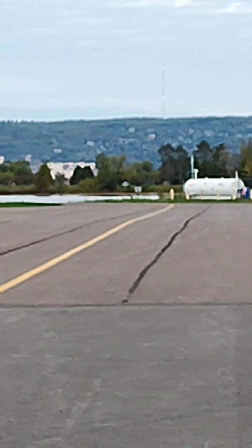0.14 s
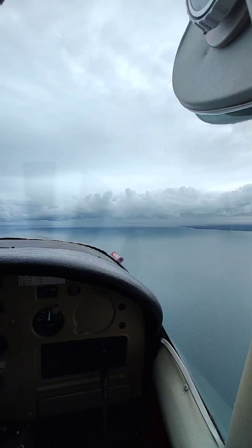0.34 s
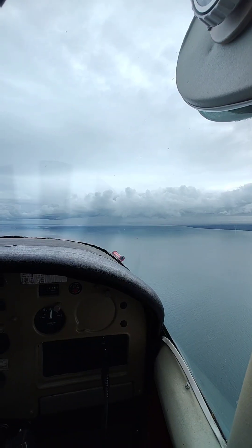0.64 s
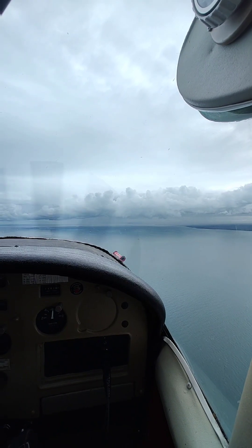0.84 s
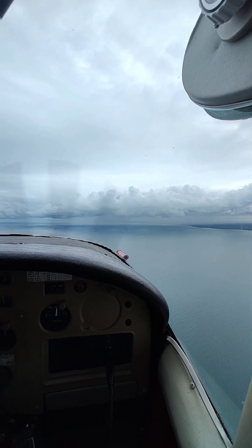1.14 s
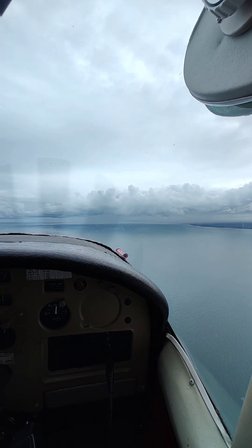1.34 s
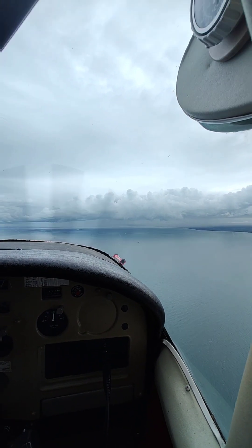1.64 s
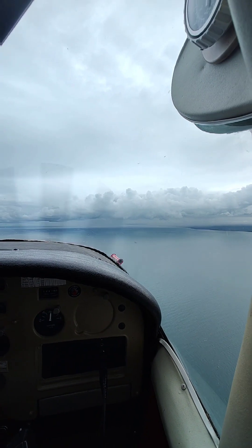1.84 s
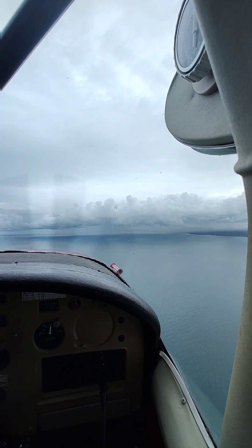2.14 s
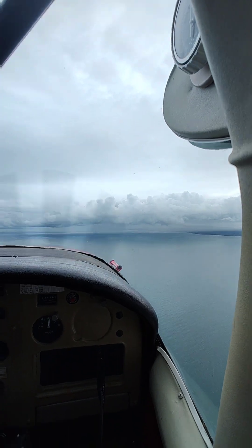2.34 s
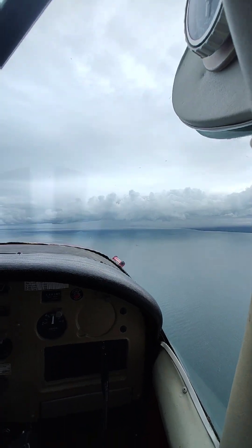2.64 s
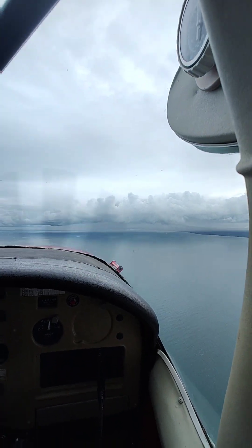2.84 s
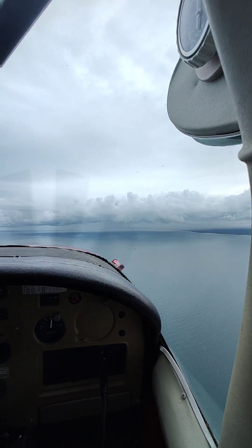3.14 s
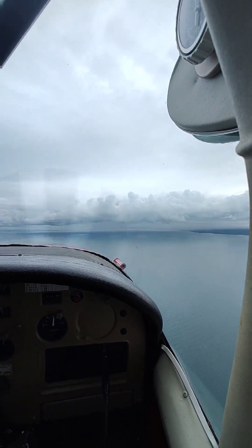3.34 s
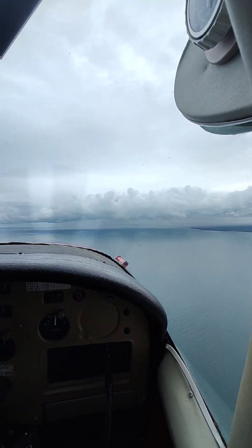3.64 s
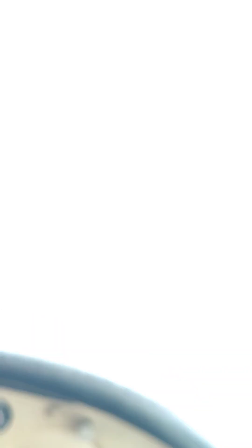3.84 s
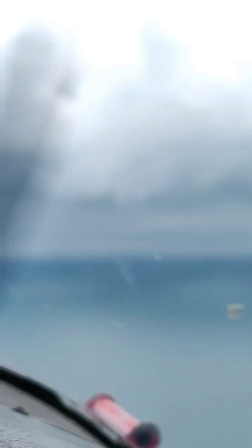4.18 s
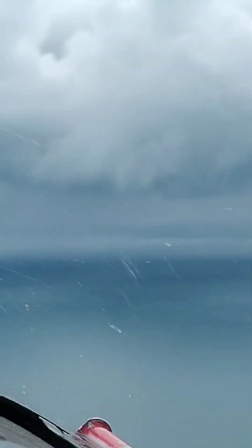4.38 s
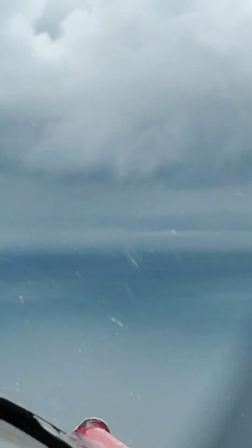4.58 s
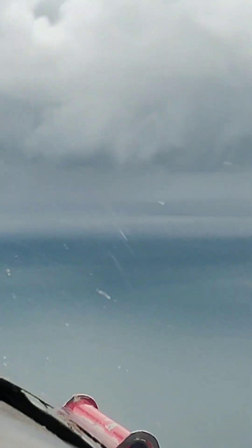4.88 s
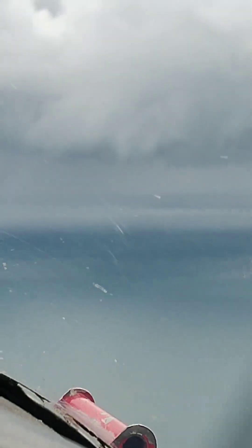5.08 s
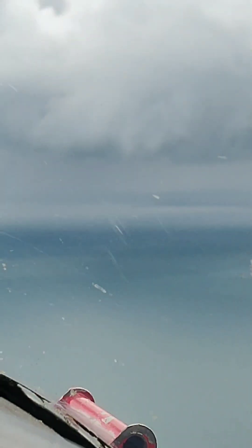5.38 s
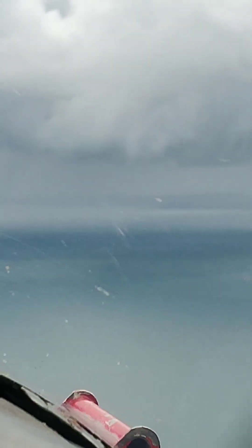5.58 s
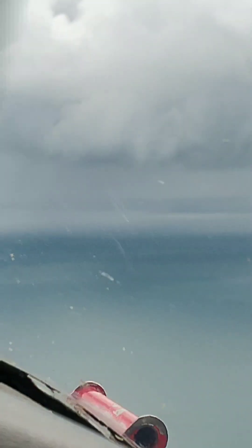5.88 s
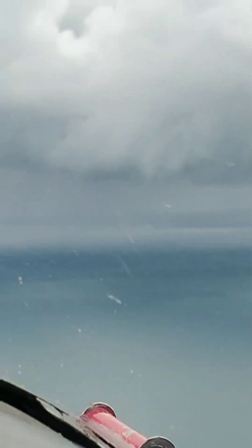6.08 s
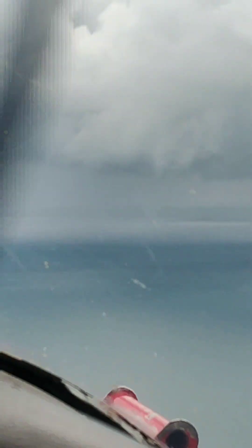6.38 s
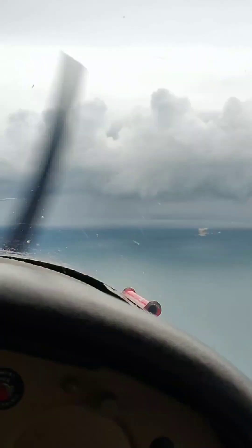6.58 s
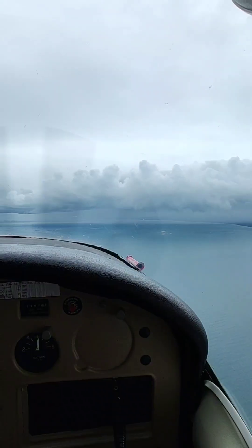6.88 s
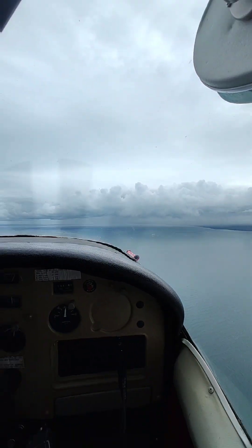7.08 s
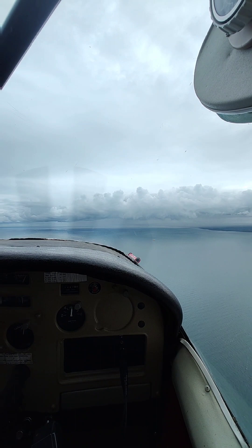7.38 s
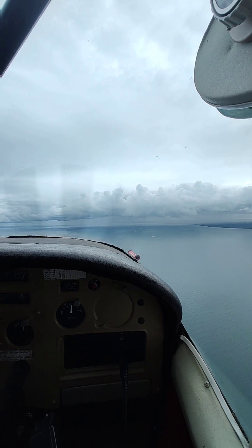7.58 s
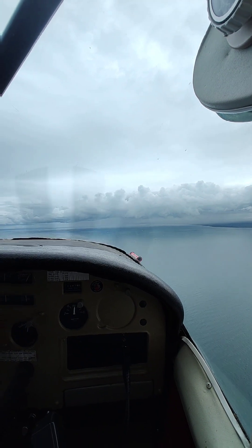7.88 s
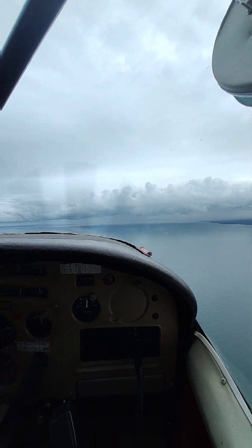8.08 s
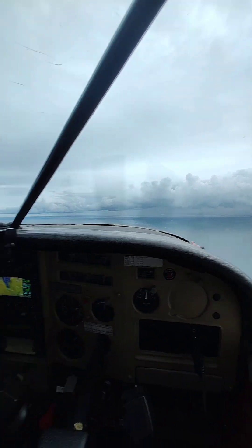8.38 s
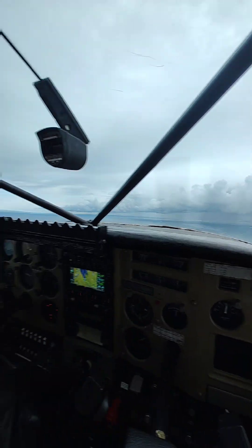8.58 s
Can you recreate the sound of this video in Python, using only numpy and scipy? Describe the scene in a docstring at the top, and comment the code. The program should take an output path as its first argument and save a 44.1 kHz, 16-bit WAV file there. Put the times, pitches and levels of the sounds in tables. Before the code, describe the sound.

A very quiet open airfield, with low airy hum, a barely audible whine and a few tiny ticks, stops after a fraction of a second. After a short silence, the loud cabin of a small piston propeller plane cuts in with a brief thumpy burst. Low engine drone, rumble and hissing slipstream hold steady; midway a phone microphone steers forward, making the roar brighter and fluttery before it settles back.

```python
"""First a quiet airfield apron: shaped noise, a faint steady-pitched whine and four decaying ticks; then silence.
At half a second the cockpit of a small piston aircraft in cruise cuts in: engine and propeller drone as sines
on multiples of the engine cycle, cabin rumble and slipstream as noise that the propeller wash modulates.
From about 4 to 6.6 s the phone zooms in and its microphones steer forward: a time-varying filter swells the
middle while bass and treble waver. The steady drone then goes on to the end."""
import sys
import numpy as np
from scipy import signal
from scipy.fft import rfft, irfft, next_fast_len
from scipy.io import wavfile
from scipy.ndimage import uniform_filter1d, map_coordinates

SR = 44100
rng = np.random.default_rng(int(sys.argv[2]) if len(sys.argv) > 2 else 0)


def int16_out(signal):
    """Quantize to a 16-bit WAV file."""
    q = np.round(np.clip(np.atleast_2d(signal).T, -1, 1) * 32767)
    wavfile.write(sys.argv[1], SR, q.astype(np.int16))


N = 384552
TIME = np.arange(N) / SR  # s


def amp(db):
    """Logarithmic level: decibels to amplitude gain."""
    return 10 ** (np.asarray(db) / 20)


def unit(x):
    """Normalization by mean power: x scaled to rms 1."""
    return x / np.sqrt(np.mean(x ** 2) + 1e-20)


def along(points, hz, axis=1):
    """Linear interpolation over log frequency of one column of (f, value, ..) points."""
    columns = np.transpose(points)
    return np.interp(np.log(hz + 1), np.log(columns[0] + 1), columns[axis])


def over_time(points, t):
    """Linear interpolation over time of (t, value) points; the end values hold outside them."""
    return np.interp(t, *np.transpose(points))


def wobble(rate):
    """Slow random modulation: a smooth curve through rate random knots a second."""
    knots = rng.standard_normal(int(N * rate / SR) + 4)
    return map_coordinates(knots, [np.arange(N) * rate / SR])


def filtered(x, response):
    """Linear filtering: the spectrum of x times a response of frequency."""
    size = next_fast_len(N + 8192)
    hz = np.fft.rfftfreq(size, 1 / SR)
    return irfft(rfft(x, size) * response(hz), size)[..., :N]


def rush(spectrum, alike, patchy_db):
    """Turbulence as patchy noise; mid and side shares set the left-right correlation; rms 1."""
    z = signal.stft(rng.standard_normal((2, N)), nperseg=512)[2]
    field = uniform_filter1d(rng.standard_normal(z.shape[1:]), size=8, axis=0)
    field = uniform_filter1d(field, size=10, axis=1)
    pair = signal.istft(z * amp(patchy_db * unit(field)), nperseg=512)[1][:, :N]

    def mid_side_gain(hz):
        angle = np.arccos(np.clip(along(alike, hz), -1, 1)) / 2
        return amp(along(spectrum, hz)) * [np.cos(angle), np.sin(angle)]

    mid, side = filtered(pair, mid_side_gain)
    return unit(np.array([mid + side, mid - side]))


# spectral shape of the apron hum: (f/Hz, relative level/dB per Hz)
APRON_SPECTRUM = [(15, -32), (30, -7), (63, -2.5), (145, -22), (225, -5.5), (386, -19), (1110, -15.5),
                  (2100, -27), (2400, -36), (4730, -30), (5300, -39), (12000, -48), (15600, -81)]
# small far ticks: (t/s, level/dB, f/Hz, 60 dB decay time/s, phase smear/rad per sample)
FAR_TICKS = [(.08, -67, 4800, .03, .05), (.097, -50, 1700, .02, .1), (.131, -56, 4300, .012, .2),
             (.164, -51, 4500, .012, .15)]
APRON_DB, APRON_END = -58, .222  # dB, s
WHINE_HZ, WHINE_DB = 1110, -72  # a faint far machine; mean peak level


def apron():
    """Superposition of distant sources: hum as noise, whine as a sine, ticks as decaying resonances."""
    out = amp(APRON_DB) * rush(APRON_SPECTRUM, [(60, 0.72), (3000, 0.26)], patchy_db=3.0)
    out = out + amp(WHINE_DB + 3 * wobble(40)) * np.sin(2 * np.pi * WHINE_HZ * TIME)
    t = np.arange(SR // 20) / SR
    for start, db, hz, t60, smear in FAR_TICKS:
        # a random walk in phase makes the ring noisy
        walk = np.cumsum(smear * rng.standard_normal(len(t)))
        tone = np.sin(2 * np.pi * hz * t + walk)
        attack = 1 - np.exp(-t / 0.0011)
        first = round(start * SR)
        out[:, first:first + len(t)] += amp(db - 60 * t / t60) * attack * tone
    return out * np.clip((APRON_END - TIME) / .003, 0, 1)


# rotation of the engine, before slight hunting: (t/s, engine cycles f/Hz)
ENGINE_CYCLE = [(.49, 20.71), (3, 20.70), (4.2, 20.69), (6.2, 20.69), (7, 20.70), (8.72, 20.70)]


def turns():
    """Phase as the integral of frequency: engine cycles so far; the governor hunts very slightly."""
    hz = over_time(ENGINE_CYCLE, TIME)
    return np.cumsum(hz * (1 + 0.00043 * wobble(1.922))) / SR


# tones in the cabin before steering: (multiple of the cycle, left rms level/dB, right rms level/dB,
# phase by which left leads/rad)
DRONE_TONES = [(1, -68, -68, -0.0), (2, -67, -67, 0.1), (3, -63, -65, 0.3), (5, -51, -51, 0.0),
               (6, -47, -45, -0.2), (7, -51, -52, -0.0), (8, -55, -55, -0.2), (9, -34, -34, -0.1),
               (10, -41, -41, -0.2), (11, -52, -61, -0.7), (12, -38, -49, 0.4), (13, -45, -53, 0.0),
               (14, -49, -53, -1.2), (15, -53, -52, 0.4), (16, -52, -66, -0.1), (17, -55, -54, -1.1),
               (18, -36, -41, 0.5), (19, -49, -56, 0.1), (20, -57, -56, -0.1), (21, -52, -56, 0.9),
               (22, -50, -56, 1.5), (23, -51, -64, -1.2), (24, -50, -46, 0.9), (25, -53, -46, -0.3),
               (26, -47, -43, -0.1), (27, -48, -50, -0.6), (28, -48, -51, -1.0), (29, -49, -53, 0.2),
               (30, -48, -52, 1.0), (33, -59, -56, 0.5), (36, -48, -46, -0.6), (41, -58, -60, 0.7),
               (42, -59, -60, 2.3), (43, -56, -60, 0.5), (44, -59, -64, -1.6), (50, -62, -61, 0.3)]


def drone(cycle):
    """Harmonic series of a periodic source: firing and blade tones, the high ones breathing more."""
    out = np.zeros((2, N))
    for k, left_db, right_db, lead in DRONE_TONES:
        phase = 2 * np.pi * (k * cycle + rng.random()) + 0.0082 * k * wobble(8)
        swell = amp(0.047 * k * wobble(5))
        peak = np.sqrt(2) * amp([[left_db], [right_db]])
        out += swell * peak * np.sin(phase + [[lead / 2], [-lead / 2]])
    return out


# spectral shape of the cabin rumble: (f/Hz, relative level/dB per Hz)
RUMBLE_SPECTRUM = [(15, -55), (30, -31), (48, -12.5), (75, -19.5), (100, -17), (135, -12), (189, -6),
                   (230, -6.5), (295, -6.5), (375, -7), (426, -13.5), (549, -4.5), (676, -12), (770, -12),
                   (950, -25), (1170, -54)]
# left-right likeness of the rumble: (f/Hz, correlation)
RUMBLE_ALIKE = [(40, 0.95), (150, 0.89), (260, 0.71), (400, 0.51), (640, 0.69), (950, 0.77), (1400, 0.28),
                (3000, 0.067), (15000, -0.071)]
# spectral shape of the slipstream: (f/Hz, relative level/dB per Hz)
SLIPSTREAM_SPECTRUM = [(470, -4.5), (800, -7.5), (1000, -4), (1550, -8), (1820, -7), (2140, 0),
                       (2490, -2.5), (3620, -2.5), (4420, -1.5), (5330, -7.5), (6430, -4), (8260, -9),
                       (12200, -30.5), (15000, -28.5), (15800, -26)]
# left-right likeness of the slipstream before its lag: (f/Hz, correlation)
SLIPSTREAM_ALIKE = [(600, 0.13), (2000, 0.15), (15000, 0.083)]
# window and vent resonances: (centre f/Hz, half-width f/Hz, level/dB)
RESONANCES = [(2130, 83, 1.5), (3250, 400, 2.5), (3670, 59, 2), (1030, 75, 2.5)]
# balance of the cabin noise: (f/Hz, left minus right level/dB)
BALANCE = [(60, 4), (110, -0.5), (240, 0.5), (400, -5), (700, 3.5), (1290, -2.5), (2380, 1.5), (4400, -2),
           (6000, 4), (8100, -1.5), (11000, -1.5), (15000, -1.5)]
RUMBLE_DB, SLIPSTREAM_DB = -35.5, -29  # mean levels before the resonances and filters
SLIPSTREAM_LAG = 0.0003647  # s by which it reaches the left side first


def cabin_noise(cycle):
    """Amplitude modulation of turbulence: propeller wash beats rumble and slipstream three times a cycle."""
    beat = np.cos(2 * np.pi * 3 * cycle)
    once = np.cos(2 * np.pi * cycle)
    rumble_db = RUMBLE_DB + 0.42 * beat + 0.29 * once
    rumble = amp(rumble_db) * rush(RUMBLE_SPECTRUM, RUMBLE_ALIKE, patchy_db=0.5)
    air_db = SLIPSTREAM_DB + 0.66 * beat + 0.26 * once + 0.33 * wobble(9)
    air = amp(air_db) * rush(SLIPSTREAM_SPECTRUM, SLIPSTREAM_ALIKE, patchy_db=0.93)

    def highpass_and_lag(hz):
        highpass = hz ** 4 / (hz ** 4 + 350 ** 4)
        return highpass * np.exp(1j * np.pi * SLIPSTREAM_LAG * np.outer([1, -1], hz))

    def cabin_response(hz):
        ring_db = sum(db / (1 + ((hz - centre) / width) ** 2) for centre, width, db in RESONANCES)
        return amp(ring_db + np.outer([.5, -.5], along(BALANCE, hz)))

    return filtered(rumble + filtered(air, highpass_and_lag), cabin_response)


# how far the microphones are steered forward: (t/s, share of full steering)
STEERING = [(3.83, 0.2), (3.9, 0), (3.98, 0.3), (4.2, 0.63), (4.3, 1), (5.1, 1.1), (5.6, 0.86), (6.2, 0.86),
            (6.3, 1.12), (6.42, .5), (6.52, 0.65), (6.65, 0.05)]
# pick-up gain at full steering: (f/Hz, left level/dB, right level/dB)
STEERED_LIFT = [(50, -6, -6), (110, 1, 2), (180, -2, -4.5), (233, 0.5, 3.5), (343, 10.5, 6.5),
                (460, 4.5, 1.5), (516, 0.5, 1.5), (580, 5.5, 6.5), (660, 1.5, -1), (750, -1.5, -1),
                (850, 2, 1.5), (1060, 7, 6.5), (1850, 5, 4.5), (2250, 7.5, 7), (2400, 4.5, 2.9),
                (2880, 6.5, 5), (3570, 5.5, 4), (4100, 2, 1.7), (5300, 0.2, 0.5)]
# how strongly each frequency follows the bass level: (f/Hz, share)
BASS_SHARE = [(80, 0.24), (190, 0.7), (260, 0.048)]
# how strongly each frequency follows the treble level: (f/Hz, share)
TREBLE_SHARE = [(3800, 0.021), (5000, 0.84)]
# wavering of the bass, before its share: (t/s, level/dB)
BASS_WAVER = [(3.83, 1.5), (3.9, -12), (4.05, 0.5), (4.28, -5), (4.5, 0), (4.75, -5), (5.1, -3.5),
              (5.23, 7), (5.34, -10), (5.47, 5), (5.62, -5.5), (5.93, 2), (6.08, -1), (6.14, -16),
              (6.23, -10), (6.33, 1), (6.45, -4), (6.51, 6), (6.6, -1)]
# wavering of the treble, before its share: (t/s, level/dB)
TREBLE_WAVER = [(3.84, 0.5), (3.9, -6), (4.07, -5), (4.16, 0.5), (4.33, 3.5), (4.42, -1), (4.6, 1.5),
                (4.9, 2), (4.96, -4), (5.05, 3), (5.16, 0), (5.25, -2), (5.32, 4), (5.43, -1.5), (5.71, 4),
                (5.78, -0.5), (5.85, 1.5), (5.93, -1.5), (6.02, 6.5), (6.12, -2), (6.17, 3), (6.29, -1.5),
                (6.33, 3.5), (6.42, -3.5), (6.5, 4), (6.62, -0.5)]
# scale of the random flutter at full steering: (f/Hz, level/dB)
STEERED_FLUTTER = [(150, 2), (300, 3), (373, 1), (470, 2), (580, 3), (700, 1.4), (1200, 2.2), (2200, 1.4),
                   (4000, .5), (6000, 1.5)]


def steered(x):
    """Directivity as a time-varying filter: the zoom lifts the middle and the ends waver."""
    hz, t, z = signal.stft(x, SR, nperseg=1024)
    zoom = over_time(STEERING, t)
    bass_db = np.outer(along(BASS_SHARE, hz), over_time(BASS_WAVER, t))
    treble_db = np.outer(along(TREBLE_SHARE, hz), over_time(TREBLE_WAVER, t))
    middle_db = np.array([np.outer(along(STEERED_LIFT, hz, axis=c), zoom) for c in (1, 2)])
    # the harder it steers, the more its gain flutters, in patches that widen with pitch
    knots = rng.standard_normal((20, len(t) // 3 + 4))
    rows = 2 * np.log2(hz / 60 + 1)
    field = map_coordinates(knots, np.meshgrid(rows, np.arange(len(t)) / 3, indexing="ij"))
    flutter_db = np.outer(along(STEERED_FLUTTER, hz), np.clip(zoom, 0, None)) * field
    gain = amp(bass_db + treble_db + middle_db + flutter_db)
    return signal.istft(z * gain, SR, nperseg=1024)[1][:, :N]


# slow drift of the cabin sound: (t/s, level/dB)
CABIN_LEVEL = [(.5, -0.25), (2, -0.5), (2.351, -1.5), (2.7, -0.6), (3.7, -.5), (6.7, 0.1), (8.1, 0),
               (8.72, -1)]
# onset of the cabin sound, one row per channel, left then right; the right opens first: (t/s)
CABIN_ONSET = [
    [.497],
    [.490],
]


def cockpit():
    """Onset transient by band: the lower middle starts loud, the deepest rumble comes up slowly."""
    cycle = turns()
    sound = amp(over_time(CABIN_LEVEL, TIME)) * steered(drone(cycle) + cabin_noise(cycle))
    since = TIME - np.array(CABIN_ONSET)
    low = filtered(sound, lambda hz: hz ** 4 / (hz ** 4 + 230 ** 4) / (1 + (hz / 1500) ** 6))
    hollow = filtered(sound, lambda hz: 1 / (1 + ((hz - 1300) / 450) ** 4))
    deep = filtered(sound, lambda hz: 1 / (1 + (hz / 90) ** 6))

    def fade(seconds):
        return np.exp(-np.abs(since) / seconds)

    # both channels time the low burst from the right channel's onset
    burst = 2.1 * np.exp(-((TIME - CABIN_ONSET[1]) / .025) ** 4)
    sound = sound + burst * low
    sound = sound + (3 * fade(0.017) + .5 * fade(0.28)) * hollow
    sound = sound - 0.6 * fade(0.35) * deep
    return sound * np.clip(since / 0.00048, 0, 1)


def scene():
    """Superposition in time: apron, silence, cockpit."""
    return apron() + cockpit()


def record(dry):
    """Band limitation: the phone keeps nothing above a short slope around 15.8 kHz."""
    return filtered(dry, lambda hz: np.clip((15800 - hz) / 150 + .5, 0, 1))


dry = scene()
out = record(dry)
int16_out(out)
```